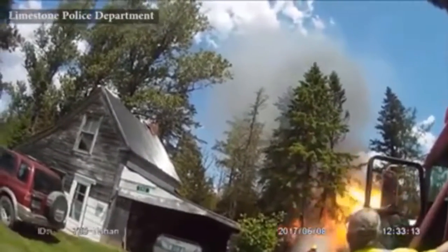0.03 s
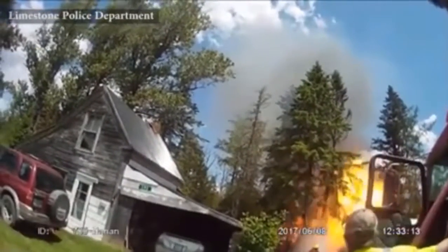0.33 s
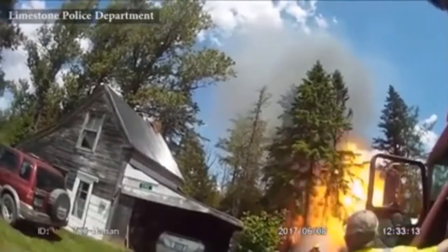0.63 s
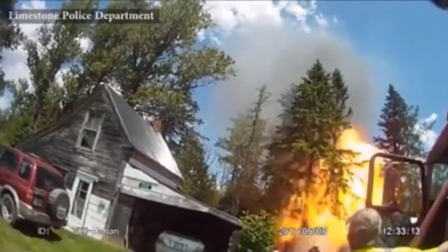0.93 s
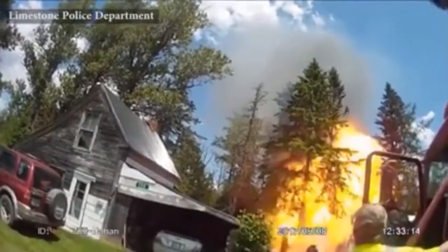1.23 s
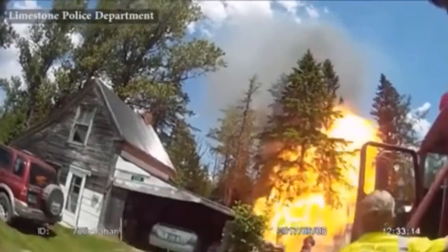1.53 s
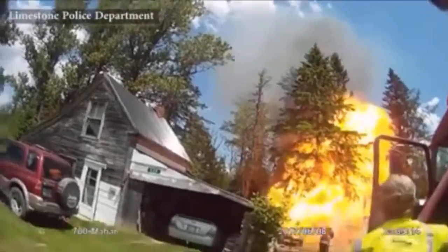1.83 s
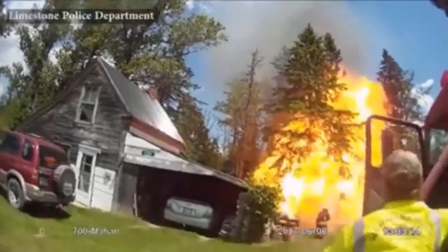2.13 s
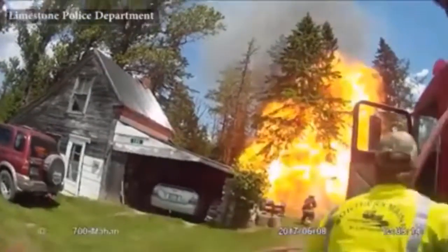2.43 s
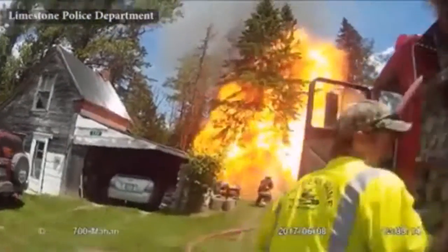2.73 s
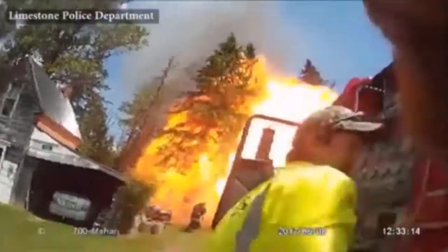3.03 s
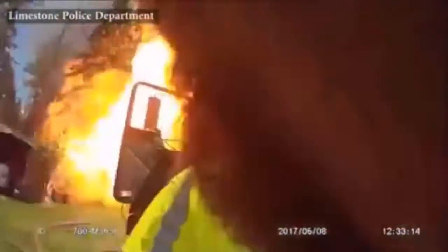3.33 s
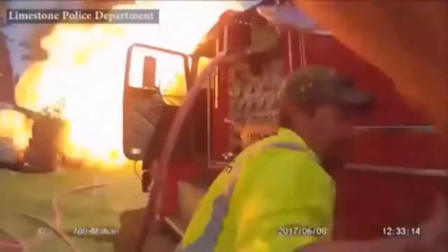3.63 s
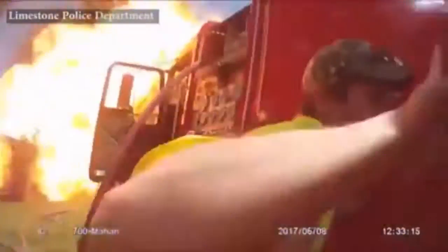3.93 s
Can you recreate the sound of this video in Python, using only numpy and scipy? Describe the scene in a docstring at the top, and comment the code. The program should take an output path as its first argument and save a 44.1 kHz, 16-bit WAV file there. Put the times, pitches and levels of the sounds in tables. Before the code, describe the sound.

Outdoors, a fire engine runs at a loud fast idle, harsh and raspy on a small close microphone. Faint crackle and thumping gusts run through it, and flames beyond the truck soon add a billowing low roar.

```python
"""A fire engine's diesel and pump roar at a steady fast idle, close beside a body-worn microphone.
The recorder adds a gritty treble rasp; rasp and roar pulse fast and regularly, and the covers ring.
Air buffets the microphone, and a faint, fine crackle runs through the treble.
About a second in, a building beyond the truck flares up and the fireball adds a billowing low roar.
The small recorder's gain dips and recovers; it limits the peaks and has no top octave."""
import sys
import numpy as np
from scipy import signal
from scipy.fft import rfft, irfft
from scipy.io import wavfile
from scipy.ndimage import uniform_filter1d, minimum_filter1d

SR = 44100
rng = np.random.default_rng(int(sys.argv[2]) if len(sys.argv) > 2 else 0)


def inscribe(sig):
    """Save sig as 16-bit PCM at rate SR to the path in sys.argv[1].

    A 1-D sig is mono; a 2-D sig holds one channel per row.
    Samples are clipped to [-1, 1] before scaling.
    """
    pcm = np.round(np.clip(np.atleast_2d(sig).T, -1, 1) * 32767)
    wavfile.write(sys.argv[1], SR, pcm.astype(np.int16))


N = 176400
TIME, FREQ = np.arange(N) / SR, np.arange(N // 2 + 1) * SR / N
SIDE = np.array([[1], [-1]])  # opposite polarity left and right


def undb(db):
    """Decibels to gain."""
    return 10 ** (np.asarray(db) / 20)


def unit(x):
    """Scale to rms 1."""
    return x / np.sqrt(np.mean(x ** 2) + 1e-18)


def curve(rows):
    """Join (t/s, value) rows by straight lines."""
    return np.interp(TIME, *np.array(rows).T)


def colour(x, points):
    """Filter through (f/Hz, level/dB) points, to rms 1."""
    hz, db = np.array(points).T
    shape_db = np.interp(np.log(FREQ + 1e-3), np.log(hz), db, left=-120, right=-120)
    return unit(irfft(rfft(x) * undb(shape_db), N))


def noise(points):
    """Coloured noise at rms 1."""
    return colour(rng.standard_normal(N), points)


def drift(hz):
    """Smooth random drift at rms 1."""
    hold = int(SR / hz)
    steps = np.repeat(rng.standard_normal(N // hold + 1), hold)
    return unit(uniform_filter1d(uniform_filter1d(steps, hold), hold)[:N])


def even(x, seconds=.13):
    """Even out the slow chance swells of a noise."""
    return x / np.sqrt(uniform_filter1d(x ** 2, int(seconds * SR)) + 1e-6)


def turbulence(points, width):
    """Noise that differs in part between left and right."""
    return even(noise(points)) + width * noise(points) * SIDE


# Pulses within one cycle of the pattern: position/cycles, level/dB
PULSES = [(0.0, 0), (0.332, -2), (0.469, -2.5), (.62, -2.5), (.87, -5.5)]

def pulsing(cycles, decay_s=.0019, scatter_db=1):
    """Power envelope, mean 1, of the fast, regular pulsing in the rasp and roar."""
    starts = np.arange(int(cycles[-1]))
    sizes = undb(scatter_db * rng.standard_normal((len(starts), len(PULSES))))
    hits = np.zeros(N)
    for (position, db), size in zip(PULSES, sizes.T):
        at = np.minimum(np.searchsorted(cycles, starts + position), N - 1)
        hits[at] += (undb(db) * size) ** 2
    power = signal.lfilter([1], [1, -np.exp(-1 / (decay_s * SR))], hits)
    return power / power.mean()


def pulsed(pulses, share):
    """White noise with a share of its power arriving in pulses."""
    return rng.standard_normal(N) * np.sqrt(1 + share * (pulses - 1))


# Fan and pump from beside the truck: f/Hz, level/dB
ROAR_SPECTRUM = [(220, -23.5), (400, -4.5), (520, -3.5), (650, -3.7), (780, -0.5), (950, 0.5), (1100, -0.5),
                 (1400, -0.8), (1800, -1.4), (1970, -7.5), (2160, -9.5), (2340, -8), (2500, -4), (2800, -7),
                 (3110, -8.5), (3230, -14.5), (3400, -17), (4000, -43), (6000, -100)]

def fan_and_pump(pulses):
    """A midrange roar with a fast pulsing in it."""
    return undb(-3) * colour(pulsed(pulses, share=.35), ROAR_SPECTRUM)


# Resonances of the engine's covers: f/Hz, half-width/Hz, level/dB
COVER_MODES = [(1217, 39, -22.5), (1534, 44, -18.5), (1637, 72, -15.5), (1724, 45, -13), (1820, 55, -15.5),
               (2465, 63, -17.5), (2580, 61, -17.5), (2692, 59, -23)]

def covers(pulses, level_db):
    """The sheet metal rings, standing out when the roar is loud."""
    drive = rfft(pulsed(pulses, share=.35))
    ring = sum(undb(db) * unit(irfft(drive / (1 + 1j * (FREQ - hz) / half_width) ** 2, N))
               for hz, half_width, db in COVER_MODES)
    return ring * undb(1.56 * (level_db - level_db.max()))


# The recorder's treble rasp: f/Hz, level/dB
RASP_SPECTRUM = [(1940, -37), (3300, -9.5), (3630, -4), (3990, -2.5), (5000, -6.5), (5410, -4),
                 (6250, -13.5), (7120, -9.5), (7500, -23), (9750, -37.5), (16500, -120)]

def recorder_rasp(pulses, share=.63, ticks_per_s=2200):
    """Gritty, pulsing distortion in the treble: tiny ticks over a hiss."""
    ticks = unit(pulsed(pulses, share) * (rng.random(N) < ticks_per_s / SR))
    return undb(-20.5) * colour(pulsed(pulses, share) + undb(4.5) * ticks, RASP_SPECTRUM)


# Exhaust from beside the truck: f/Hz, level/dB
EXHAUST_SPECTRUM = [(15, -33), (27, -10), (60, -9), (120, -4), (170, 0), (250, 1.5), (350, 1), (430, -4.5),
                    (560, -24)]

def exhaust_rumble():
    """The low rush of the exhaust gas."""
    return undb(-13.5) * noise(EXHAUST_SPECTRUM)


# Exhaust tones: multiple of the firing rate, level/dB
EXHAUST_HARMONICS = [(2, -36), (3, -37.5), (4, -40.5), (5, -40.5)]

def exhaust_drone(cycles):
    """Harmonics of the firing rate, each wavering in level."""
    return sum(undb(db + 2 * drift(hz=7.3)) * np.sqrt(2) * np.sin(2 * np.pi * (k * cycles + rng.random()))
               for k, db in EXHAUST_HARMONICS)


# Reflections reaching the microphone: delay/s, level/dB
ECHOES = [(.0043, -26.5), (.0074, -23), (0.015, -21), (0.026, -23), (0.044, -19.5)]

def echoed(x):
    """Sound bounces off the ground and the side of the truck."""
    return x + sum(undb(db) * np.roll(x, int(delay * SR)) for delay, db in ECHOES)


# Level of the steady roar as the recorder's gain dips and recovers: t/s, level/dB
ROAR_LEVEL = [(0.0, -11.5), (0.52, -10.5), (0.59, -10), (0.73, -12.5), (0.79, -11), (1.1, -13),
              (1.31, -14.5), (1.38, -16.5), (1.51, -16), (1.59, -14.5), (1.76, -13), (1.82, -15.5),
              (2.09, -14), (2.15, -16), (2.48, -12.0), (2.57, -13.5), (2.67, -11.5), (2.86, -11.5),
              (3.04, -14), (3.12, -13.5), (3.34, -15.5), (3.48, -12), (3.73, -17), (3.81, -14),
              (3.9, -11.5), (3.99, -14.5)]

def machine(firing_hz=52.97, speed_wander=.002):
    """Diesel and pump run steadily close by; roar and rasp follow the dips in the recorder's gain."""
    cycles = np.cumsum(firing_hz * (1 + speed_wander * drift(hz=3))) / SR
    pulses, level_db = pulsing(cycles), curve(ROAR_LEVEL)
    roar = fan_and_pump(pulses)
    ring = covers(pulses, level_db)
    rasp = recorder_rasp(pulses)
    rumble = exhaust_rumble()
    drone = exhaust_drone(cycles)
    flutter_db = .67 * drift(hz=21.95)
    return (echoed(roar + ring + rumble) + rasp) * undb(level_db + flutter_db) + drone


# Gusts right on the microphone: t/s, level/dB
BUFFET_LEVEL = [(0.0, -29.5), (0.47, -25), (0.54, -23.5), (0.78, -25), (1.1, -16), (1.18, -22), (1.47, -17),
                (1.57, -24), (1.82, -16), (1.98, -21.7), (2.33, -19.3), (2.76, -24), (3.04, -18),
                (3.17, -21.5), (3.29, -13.5), (3.49, -22), (3.71, -15.5), (3.99, -24)]
# Their rumble: f/Hz, level/dB
BUFFET_SPECTRUM = [(10, -36.5), (20, -1), (29, -3.5), (45, -4.5), (68, -4), (95, -16), (200, -33)]

def buffets():
    """Gusts of air thump on the microphone."""
    return turbulence(BUFFET_SPECTRUM, width=.48) * undb(-3 + curve(BUFFET_LEVEL))


# Faint, fine treble crackle: f/Hz, level/dB
CRACKLE_SPECTRUM = [(600, -24.5), (1600, -7), (3000, 1.5), (3600, -8), (5500, -1), (7400, 1.5),
                    (9000, -32.5)]

def crackle(snaps_per_s=200, spread_db=3.2, decay_s=.0008):
    """Many tiny snaps throughout, a few larger."""
    onsets = rng.random(N) < snaps_per_s / SR
    sizes = undb(spread_db * np.minimum(rng.exponential(size=N), 4))
    bursts = signal.lfilter([1], [1, -np.exp(-1 / (decay_s * SR))], onsets * sizes)
    return undb(-45) * colour(bursts * rng.standard_normal(N), CRACKLE_SPECTRUM)


# Stereo noise floor: f/Hz, level/dB
FLOOR_SPECTRUM = [(200, 21.5), (500, 19), (1000, -29), (2200, -30.5), (4000, -6.5), (7400, -8)]

def stereo_floor():
    """A faint, wide rumble and hiss."""
    return undb(-50.5) * noise(FLOOR_SPECTRUM) * SIDE


# Billows of the fire beyond the truck, before the flare's fade-in: t/s, level/dB
FLAME_LEVEL = [(0.0, -18), (0.19, -27), (0.53, -19.3), (0.75, -21), (1.19, -15.2), (1.81, -17.5),
               (1.91, -14.5), (2.16, -19.5), (2.28, -14), (2.47, -17), (2.97, -23), (3.13, -17.2),
               (3.35, -21), (3.99, -13)]
# Roar of the flames: f/Hz, level/dB
FLAME_SPECTRUM = [(45, -32), (75, -2), (110, 1.5), (180, 1), (260, -.5), (340, -2), (450, -11.5),
                  (650, -18.5), (800, -15), (1100, -19.5), (1500, -36.5)]

def fireball(flare_at_s=.9, rise_s=.13):
    """The flames flare up into a flickering low roar."""
    flare = .5 + .5 * np.tanh((TIME - flare_at_s) / rise_s)
    roar = turbulence(FLAME_SPECTRUM, width=.17)
    flicker_db = .64 * drift(hz=11)
    return roar * flare * undb(-4 + curve(FLAME_LEVEL) + flicker_db)


# A brief gap in the treble: start/s, end/s, f/Hz, width/Hz
TREBLE_GAP = (1.28, 1.77, 2140, 130)

def hollow(x, depth=.9, fade_s=.08):
    """A narrow band of the sound drops out for a moment."""
    start, end, hz, width_hz = TREBLE_GAP
    band = irfft(rfft(x) * np.exp(-(2 * (FREQ - hz) / width_hz) ** 4), N)
    gate = uniform_filter1d(1. * ((TIME > start) & (TIME < end)), int(fade_s * SR))
    return x - depth * band * gate


# Surges in the burning building: t/s, half-length/s, f/Hz, level/dB
SURGES = [(1.921, 0.053, 159, -23), (2.274, 0.053, 300.6, -22), (3.154, .06, 278, -26.5),
          (3.923, .09, 276, -22)]

def surges(step_octaves=.11):
    """The flames hoot like a flue, in short swells of narrow-band noise."""
    hoots = np.zeros(N)
    for at, half_length, hz, db in SURGES:
        band = [(hz * 2 ** (k * step_octaves), -4 * k * k) for k in range(-3, 4)]
        swell = np.exp(-((TIME - at) / half_length) ** 2)
        hoots += even(noise(band)) * undb(db) * swell
    return hoots


def scene():
    """Standing beside the truck: the machine close by, the fire beyond it."""
    return stereo_floor() + hollow(machine() + crackle()) + fireball() + surges() + buffets()


def record(dry, drive=.3, target_db=-12.5, gain_strength=.4, limit_db=-3, top_hz=7500):
    """Body-worn microphone and recorder: soft overload, automatic gain, fast limiter, steep top cut."""
    saturated = np.tanh(drive * dry) / drive
    gain_window, limit_window = int(.04 * SR), int(.0071 * SR)
    loudness = np.sqrt(uniform_filter1d(np.mean(saturated ** 2, axis=0), gain_window) + 1e-9)
    levelled = saturated * (undb(target_db) / loudness) ** gain_strength
    duck = np.minimum(1, undb(limit_db) / (np.abs(levelled).max(axis=0) + 1e-9))
    limited = levelled * uniform_filter1d(minimum_filter1d(duck, limit_window), limit_window)
    return signal.sosfilt(signal.ellip(12, .2, 90, top_hz, fs=SR, output="sos"), limited)


dry = scene()
out = record(dry)
inscribe(out)
```